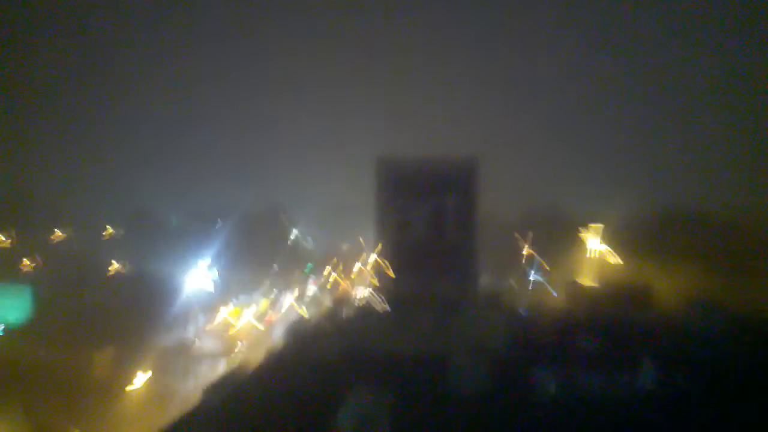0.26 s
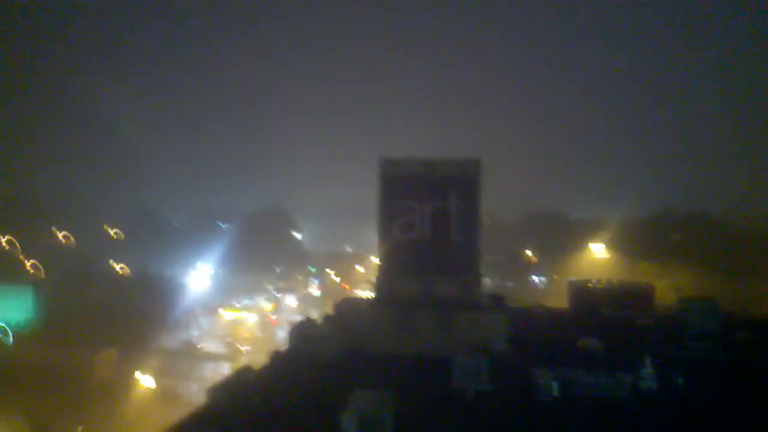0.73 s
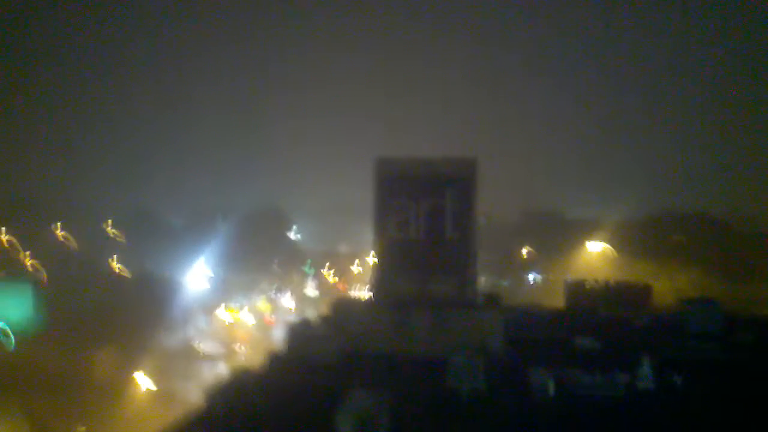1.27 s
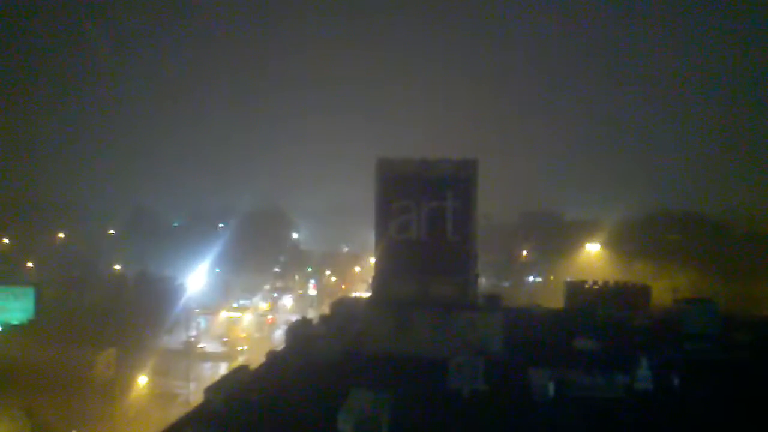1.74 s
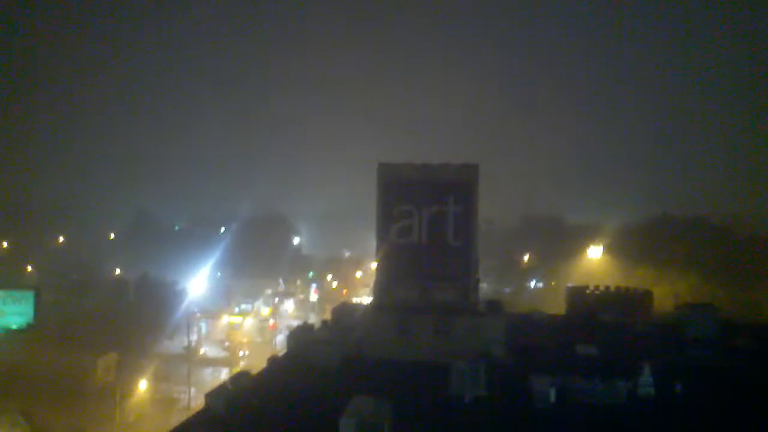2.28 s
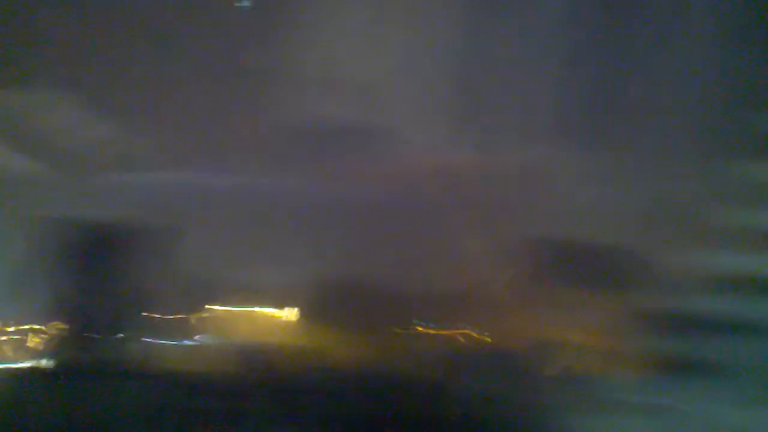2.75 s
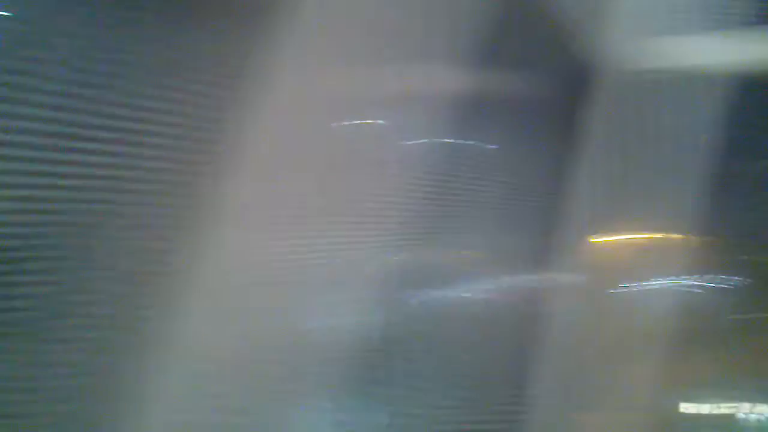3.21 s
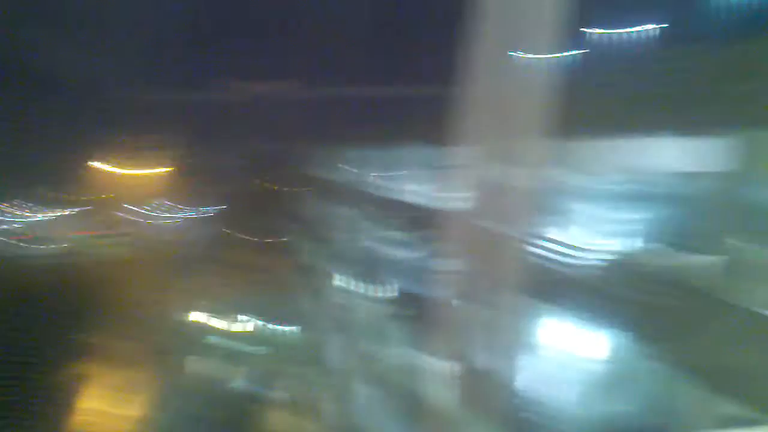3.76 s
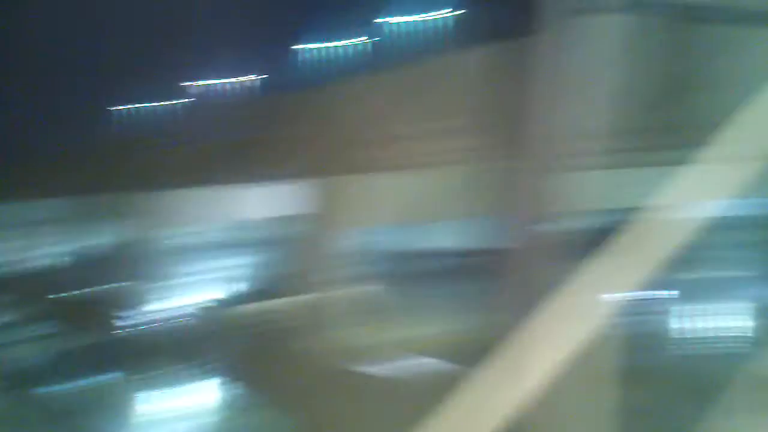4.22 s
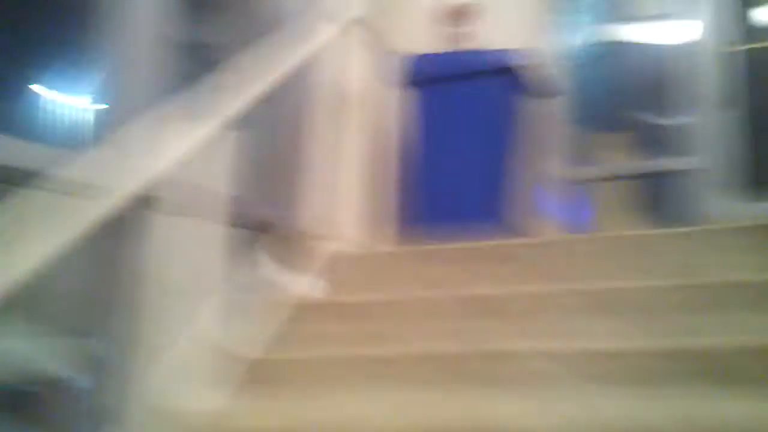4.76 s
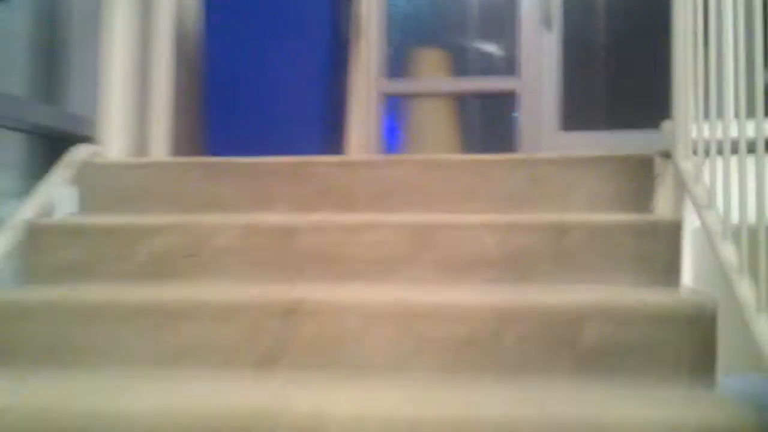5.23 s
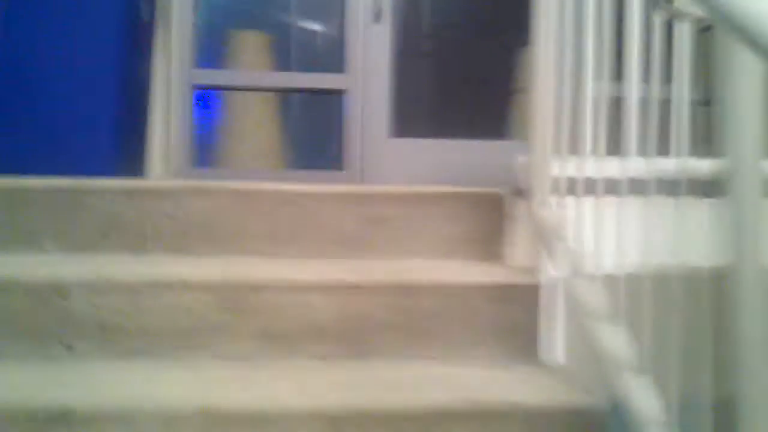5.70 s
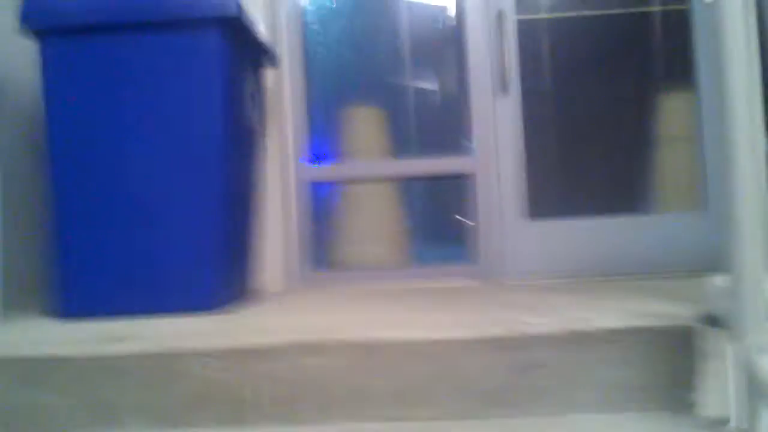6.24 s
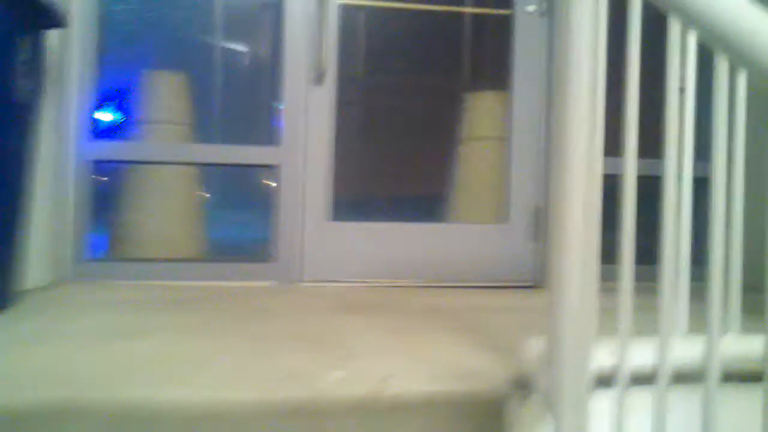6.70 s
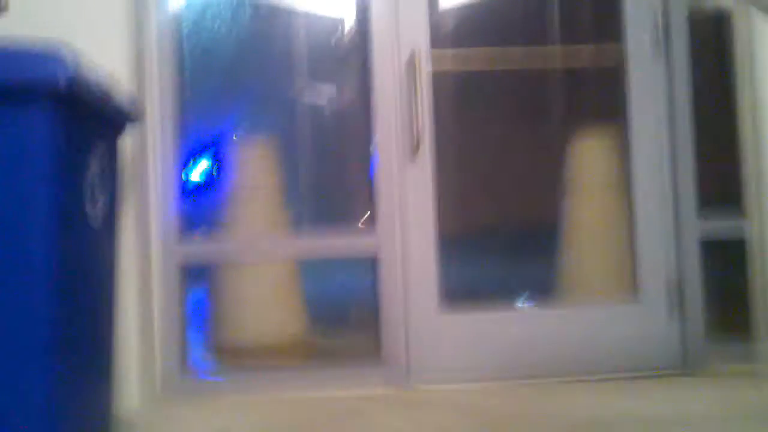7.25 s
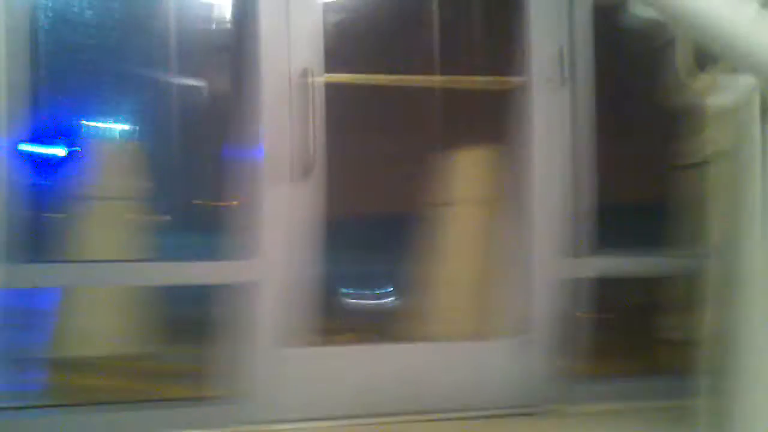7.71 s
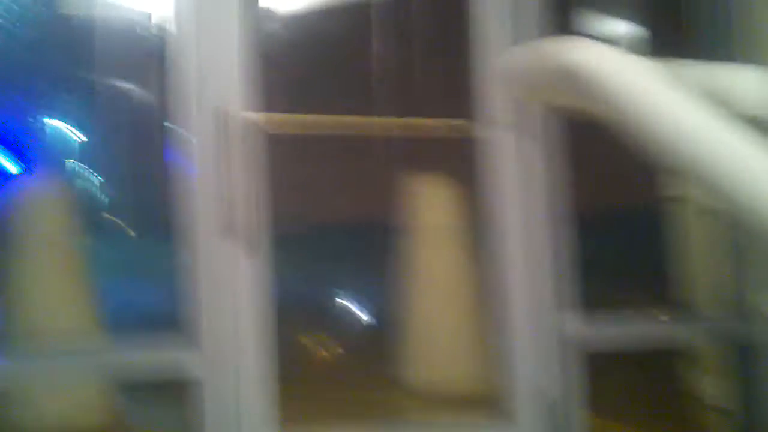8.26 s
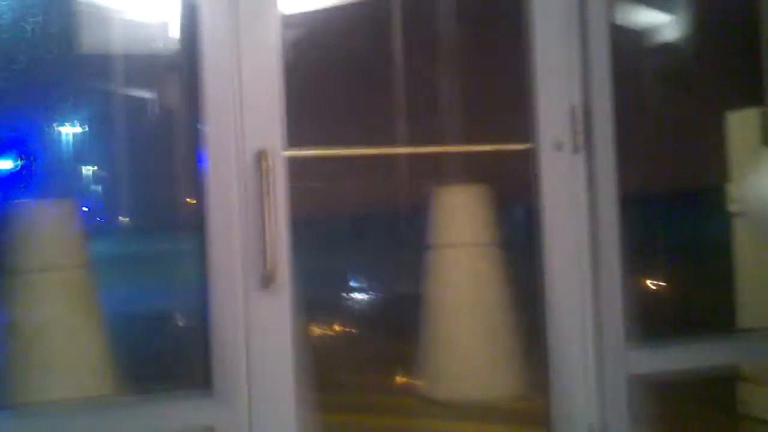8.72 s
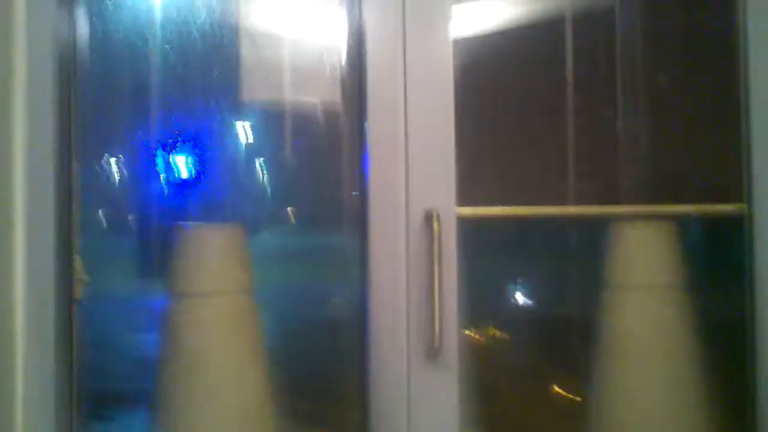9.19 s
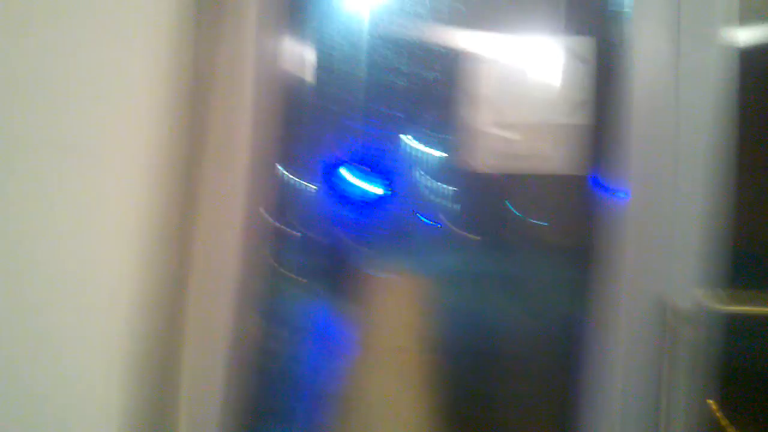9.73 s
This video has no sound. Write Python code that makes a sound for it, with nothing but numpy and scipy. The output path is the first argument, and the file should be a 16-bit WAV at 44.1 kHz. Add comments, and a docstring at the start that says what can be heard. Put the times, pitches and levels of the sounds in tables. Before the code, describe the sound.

A storm heard from inside a glass-fronted concrete stairwell on a handheld stereo phone. At first irregular, sharp hail cracks stand out over a moderate rain roar and fine ticking. Then the rain thickens into a loud broad wash, with patter on panes and doors, bright spray flurries and hollow boom. A few late hail hits give way to steady rain, with low resonances rising at the end.

```python
"""Rain and hail drive against the glass front of a concrete stairwell, heard by a phone carried along.
First, rain drums on roof and window, small hailstones tick and large ones crack on the glass close by.
After two seconds the window fades; roof and panes grow louder, spray comes in flurries and gusts swell.
Near the doors, large stones grow rarer, then stop, and two low resonances rise towards the end.
Rain is random pulses shaped by the colour of what they hit; two capsules make a left and a right beam."""
import sys
import numpy as np
from scipy import signal
from scipy.fft import rfft, irfft, next_fast_len
from scipy.io import wavfile

SR = 44100
rng = np.random.default_rng(int(sys.argv[2]) if len(sys.argv) > 2 else 0)


def dump_mix(stems):
    """Bounce the given channels to the path in sys.argv[1] as a 16-bit WAV at rate SR."""
    frames = np.atleast_2d(stems).T  # one column per channel
    limited = np.clip(frames, -1, 1)  # hard clip at full scale
    pcm = np.round(limited * 32767).astype(np.int16)
    wavfile.write(sys.argv[1], SR, pcm)


N = 439662
TIME = np.arange(N) / SR  # seconds

# Strength of the storm. Each row: time in seconds, drumming on the roof in dB, rain on the glass in dB.
STORM_STRENGTH = [(0.0, -35.5, -34), (1.15, -35.5, -33), (1.45, -34.5, -31), (2.3, -30, -31),
                  (3.15, -30.5, -28), (3.9, -25.5, -25), (4.2, -26.5, -26.5), (4.6, -25.5, -24),
                  (4.8, -26.5, -26), (5.35, -26.5, -24), (5.9, -29.5, -27), (6.2, -28.5, -25),
                  (6.75, -25.5, -25), (7.05, -26.5, -25.5), (7.95, -27, -23.5), (9.05, -27.5, -24),
                  (9.55, -30, -26), (9.97, -30, -27.5)]
# How a layer follows the storm. Values: its dB when the storm stands at STRONG_DB, dB gained per dB of storm.
WASH_FOLLOWS = (-28, 0.9)
PATTER_FOLLOWS = (-27.5, 1.31)
STRONG_DB = -26

# Colours: how strongly a thing sounds at each frequency, before its level is set.
# Hollow boom of the stairwell. Each row: frequency in Hz, strength in dB per Hz.
BOOM_COLOUR = [(20, -38), (45, -31), (70, -22), (110, -5), (170, -1.5), (255, 1.5), (320, -6), (500, -22),
               (1500, -80)]
# The boom changes from place to place. Each row: time in seconds, level in dB.
BOOM_LEVEL = [(0.0, -43.5), (1.1, -42), (1.5, -38), (2.3, -38), (3.5, -40.5), (5.0, -37.5), (7.6, -37),
              (8.5, -39), (9.97, -37.5)]
# Two narrow low resonances that grow near the doors. Each row: time in seconds, lower in dB, upper in dB.
DRONE_LEVELS = [(0, -49, -56), (4, -51, -56), (7.3, -45.5, -43), (8.2, -39, -48), (9.2, -39.5, -41),
                (9.6, -32, -38), (9.97, -36, -34)]
# Lower resonance. Each row: frequency in Hz, strength in dB per Hz.
LOWER_DRONE_COLOUR = [(60, -71), (225, -22), (246, -16), (252, 0), (258, -12), (280, -21.5), (600, -49)]
# Upper resonance. Each row: frequency in Hz, strength in dB per Hz.
HIGHER_DRONE_COLOUR = [(100, -74), (300, -19.5), (325, -10), (338, -1), (350, 5), (378, -18), (800, -57)]
# Roof under the drops. Each row: frequency in Hz, strength in dB per Hz.
ROOF_COLOUR = [(80, -51), (200, -14), (300, -5.5), (400, -2), (500, -4.5), (620, -7), (800, -12),
               (1050, -22), (3000, -52.5)]
# Wash of all the rain together. Each row: frequency in Hz, strength in dB per Hz.
WASH_COLOUR = [(60, -31.5), (250, -7.5), (580, -6.5), (730, -4.5), (900, -3), (1100, -5.5), (1350, -3.5),
               (1700, -3.5), (2600, -9), (5000, -18.5), (14000, -36)]
# Ledges outside. Each row: frequency in Hz, strength in dB per Hz.
LEDGE_COLOUR = [(350, -36), (570, -11), (660, 1.5), (760, 1), (860, -2), (1200, -35.5)]
# Rain drumming on the ledges. Each row: time in seconds, level in dB.
LEDGE_LEVEL = [(0, -44), (1.25, -52), (1.5, -38), (2.05, -47), (2.25, -34.5), (2.5, -40), (2.72, -32),
               (2.9, -46), (3.6, -41), (4.1, -37), (4.6, -36), (4.74, -48), (5.0, -33.5), (5.4, -36),
               (5.85, -39.5), (6.7, -36.5), (8.0, -35), (9.0, -36), (9.7, -41)]
# Gusts on single panels. Each row: time of the peak in seconds, level in dB, panel pitch in Hz,
# half length in seconds.
PANEL_GUSTS = [(2.08, -40, 1180, .25), (3.75, -32, 424, 0.26), (3.88, -36.5, 1150, 0.23),
               (4.3, -39, 1120, .2), (4.42, -30, 435, 0.15), (5.17, -39, 590, .18), (5.2, -35, 375, 0.17),
               (5.72, -37.5, 225, .15), (6.72, -32.5, 377, 0.12), (7.92, -31.5, 500, .14),
               (7.98, -37, 1465, .22)]
PANEL_WIDTH_HZ = 80  # half width of a panel's resonance

# Fine spray between flurries. Each row: time in seconds, level in dB.
STEADY_SPRAY = [(0, -44), (.7, -44.5), (1.2, -41.5), (1.55, -40.5), (2.25, -39.5), (2.4, -50), (2.7, -37.5),
                (3.3, -37), (4.3, -31.5), (4.85, -34), (5.2, -30.5), (5.95, -32.5), (6.4, -31.5),
                (7.3, -32.5), (8.4, -31), (9.05, -30.5), (9.45, -31.5), (9.97, -33.5)]
# Spray on the glass. Each row: frequency in Hz, strength in dB per Hz.
SPRAY_COLOUR = [(1000, -45), (3000, 1), (5000, -13), (6100, -2), (7400, 3), (8500, 2.5), (10000, 0),
                (12000, -2), (13000, -5.5), (14000, -7.5)]
# Flurries of drops. Each row: onset in seconds, peak of the added burst in dB relative to the steady fall,
# rise time in seconds, decay time in seconds.
FLURRY_TABLE = [(.125, 8, .016, .022), (.77, 10, 0.015, 0.044), (1.24, 7.5, .09, 0.082),
                (1.66, 7, .012, .027), (1.87, 5, .04, .08), (2.448, 12, .012, 0.044),
                (2.54, 10, .014, 0.034), (2.8, 5, .014, .04), (4.56, 6, .05, .08), (4.65, 2, .03, .02),
                (5.02, 4.5, 0.04, .1), (5.27, 3, 0.035, 0.063), (5.5, -4, .03, .07),
                (6.025, 6, 0.01, 0.062), (6.53, 2, 0.023, .05), (6.64, 2, .025, .045), (7.5, -7, .02, 0.02),
                (7.9, 5.5, .02, 0.071), (8.48, -1, .04, .1)]
# Near panes under rain. Each row: frequency in Hz, strength in dB per Hz.
PANE_COLOUR = [(400, -40), (1100, -23.5), (1600, -9), (1900, 3.5), (2350, 3), (2900, -8), (3500, -10.5),
               (4300, -13.5), (5200, -14.5), (6200, -11), (7400, -10), (9000, -14), (14000, -26)]
# Rain on the doors. Each row: time in seconds, level in dB.
DOOR_LEVEL = [(0, -47), (3.3, -52), (3.9, -45), (4.3, -53), (4.65, -34), (4.85, -36.5), (5.5, -36),
              (5.95, -38), (6.15, -36), (7.4, -34), (8.5, -34), (9.15, -32.5), (9.97, -38)]
# Door glass, which rings higher than the window's. Each row: frequency in Hz, strength in dB per Hz.
DOOR_COLOUR = [(900, -40), (2200, -17.5), (2900, 3.5), (3400, -0.5), (4200, -6.5), (5200, -10), (7000, -23),
               (14000, -34)]
# First window, which rings at a few pitches. Each row: frequency in Hz, strength in dB per Hz.
WINDOW_COLOUR = [(40, -58), (250, -18), (560, -13.5), (720, -2), (900, -14.5), (1300, -8.5), (1650, -19),
                 (2900, -30), (3500, -14), (4200, -20.5), (9000, -33)]
# Small hailstones on that window. Each row: frequency in Hz, strength in dB per Hz.
SMALL_HAIL_COLOUR = [(100, -46), (900, -12), (2500, -21), (3500, 17.5), (4800, -15), (6200, 20), (7700, 11),
                     (9000, 12), (11000, 1), (14000, 0)]
# First window: level against the roof, when it is left, how fast it fades, and by how much in all.
WINDOW_DB, LEAVE_S, LEAVE_DB_PER_S, LEFT_BEHIND_DB = -0.5, 2.15, 22, 27
# Small hailstones: average count per second, level against the window's drops, spread of sizes.
PELLETS_PER_S, PELLET_DB, PELLET_SCATTER_DB = 56, -22, 4

# Large hailstones close by. Each row: time in seconds, snap in dB, pitch of the snap in Hz,
# ring of the glass in dB, knock of the pane in dB, decay time of knock and splinters in seconds.
HAILSTONES = [(0.124, -12, 7600, -22, -15, 0.006), (.140, -27, 7800, -29, -29, .006),
              (.146, -20, 7700, -37, -32, .011), (.1684, -18, 7500, -24, -23, .0088),
              (.185, -32, 7600, -30, -31, .005), (.4074, -11, 11100, -13.5, -19.5, 0.0072),
              (.4682, -37, 7000, -27, -23, .007), (.6163, -35, 7000, -38, -23, .006),
              (.684, -33, 7500, -32, -28, .0055), (.762, -20, 7500, -30, -37, .005),
              (.7802, -28, 7500, -28, -26, 0.0066), (.868, -36, 7000, -34, -24, .006),
              (.881, -34, 7500, -25, -24, 0.0097), (0.984, -26, 7000, -28, -23, .008),
              (1.18, -23, 7500, -27, -33, .005), (1.350, -27, 8000, -27, -26, .005),
              (1.3645, -18, 7900, -19, -21, .008), (1.416, -35, 7000, -35, -21, .005),
              (1.540, -29, 7600, -25, -21, 0.0077), (1.558, -38, 7500, -26, -19, .009),
              (1.668, -22, 7500, -29, -31, .006), (1.775, -35, 7500, -26, -30, 0.0044),
              (1.9583, -11.5, 10160, -26, -20, .012), (1.962, -27, 7300, -27, -16.5, .007),
              (1.9693, -31, 7300, -22, -17, .009), (2.0149, -8.5, 8340, -10.5, -22, 0.006),
              (2.073, -26, 11300, -36, -32, .004), (2.295, -32, 8000, -33, -21, .006),
              (2.3063, -11.5, 8140, -31, -23, .006), (2.4474, -15, 11500, -22, -21, .005),
              (2.4635, -23, 11000, -27, -22, .008), (2.481, -25, 8600, -33, -28, .005),
              (2.557, -30, 7500, -30, -31, .005), (2.716, -31, 7500, -35, -23.5, .0085),
              (2.809, -20, 6700, -28, -21, .01), (4.570, -19, 8000, -30, -32, .008),
              (4.686, -14, 8700, -30, -35, .014), (4.893, -28, 7500, -22, -26, .005),
              (5.304, -22, 8000, -26, -26, .006), (6.0305, -22, 10400, -14, -28, 0.0093),
              (6.048, -24, 9000, -20, -23, .007), (6.305, -28, 7500, -18, -30, .005)]
# Snap of a stone. Each row: frequency in Hz, strength in dB per Hz.
SNAP_COLOUR = [(1000, -22), (3500, -9), (4800, -12), (6200, 5), (9000, 4.5), (11500, 3), (14000, -9.5)]
SPOT_DB, SPOT_WIDTH_HZ = 6, 920  # boost at the snap's own pitch, and its half width
# Knock of the pane. Each row: frequency in Hz, strength in dB per Hz.
KNOCK_COLOUR = [(40, -42), (200, -12), (550, -0.5), (1400, 3), (2000, 11), (2800, 4.5), (3500, -2),
                (4600, -5), (8000, -12), (14000, -49)]
# Struck spot: pitch, its spread as a share, decay time, lag at the second capsule.
RING_HZ, RING_SPREAD, RING_S, RING_LAG_S = 3610, .02, 0.0013, .00003

CAPSULE_LAG = 17  # longest lag between the two capsules, in samples
BEAM_NULL_HZ = 2610  # the beams' delay lasts one cycle here, which leaves a narrow hollow
# How much of the other capsule each channel subtracts. Each row: frequency in Hz, share from 0 to 1.
OTHER_CAPSULE_SHARE = [(4150, 1), (4500, .35), (5300, .33), (7000, .13), (14000, .2)]
# Extra narrow cut around 2.6 kHz in the middle of the stereo image. Each row: frequency in Hz, gain in dB.
MIDDLE_CUT = [(2490, 0), (2550, -7), (2660, -8), (2720, 0)]
TOP_HZ = 13950  # the treble is cut above this


def undb(db):
    """Turn decibels into gain."""
    return 10 ** (np.asarray(db) / 20)


def curves(table):
    """Turn each column of a table into a curve over time."""
    s, *columns = np.transpose(table)
    return [np.interp(TIME, s, column) for column in columns]


def walk(rate):
    """Wander in straight lines between random levels, `rate` of them a second; the spread is near 1."""
    levels = rng.standard_normal(2048)
    return 1.2 * np.interp(TIME * rate, np.arange(len(levels)), levels)


def follow(storm_db, law):
    """Level of a layer that rises and falls with the storm."""
    strong_db, slope = law
    return strong_db + slope * (storm_db - STRONG_DB)


def ring(pulses, colour, size=4096):
    """A struck body answers each pulse only afterwards, with its own colour; the energy is kept."""
    hz, db = np.transpose(colour)
    grid = np.maximum(np.fft.rfftfreq(size, 1 / SR), 1)
    gain = undb(np.interp(np.log(grid), np.log(hz), db))
    # folding the cepstrum forward puts the energy as early as this colour allows (minimum phase)
    cepstrum = irfft(np.log(gain))
    cepstrum[1:size // 2] *= 2
    cepstrum[size // 2 + 1:] = 0
    response = irfft(np.exp(rfft(cepstrum)))
    response = response / np.linalg.norm(response)
    return signal.oaconvolve(pulses, response[None], axes=1)[:, :pulses.shape[1]]


def impacts(strength, rate, scatter_db, side, width):
    """Random hits, on average `rate` a second; each has its own size, direction and lag between capsules."""
    n = len(strength)
    hit = rng.random(n) < rate / SR
    sign = np.sign(rng.standard_normal(n))
    size = hit * sign * undb(scatter_db * rng.standard_normal(n))
    size = size * strength / np.std(size)
    bearing = np.clip(side + width * rng.uniform(-1, 1, n), -1, 1)
    lag = np.round(CAPSULE_LAG * bearing).astype(int)
    arrival = (np.arange(n) + lag) % n
    return np.array([size, np.bincount(arrival, size, n)])


def stairwell_boom():
    """Dense pulses excite the hollow low boom of the stairwell, with a level that wavers."""
    level_db, = curves(BOOM_LEVEL)
    strength = undb(level_db + 0.87 * walk(rate=9))
    return ring(impacts(strength, rate=5000, scatter_db=0.5, side=-0.32, width=1.44), BOOM_COLOUR)


def low_resonances():
    """Dense pulses excite two narrow bands, so each hums near one pitch."""
    lower_db, upper_db = curves(DRONE_LEVELS)
    lower = impacts(undb(lower_db), rate=5000, scatter_db=1.5, side=0, width=0.42)
    upper = impacts(undb(upper_db), rate=5000, scatter_db=1.0, side=0, width=0.37)
    # the longer response leaves room for the narrower resonance
    return ring(lower, LOWER_DRONE_COLOUR, size=16384) + ring(upper, HIGHER_DRONE_COLOUR)


def roof_drumming(roof_db):
    """Heavy drops strike the roof so often that they merge into a roar."""
    strength = undb(roof_db + 0.33 * walk(rate=14))
    return ring(impacts(strength, rate=8000, scatter_db=2, side=-0.056, width=0.9), ROOF_COLOUR)


def rain_wash(roof_db, glass_db):
    """Very dense drops blend into a broad wash that follows the storm on roof and glass."""
    level_db = follow((roof_db + glass_db) / 2, WASH_FOLLOWS)
    strength = undb(level_db + 1.3 * walk(rate=17))
    return ring(impacts(strength, rate=14000, scatter_db=2.5, side=-0.044, width=0.9), WASH_COLOUR)


def ledge_rain():
    """Drops drum on the ledges outside, which resound in one band."""
    level_db, = curves(LEDGE_LEVEL)
    return ring(impacts(undb(level_db), rate=3000, scatter_db=2.5, side=-0.043, width=.85), LEDGE_COLOUR)


def gusts_on_panels():
    """Each gust presses rain onto one panel of roof or wall, whose resonance swells and sinks back."""
    out = np.zeros((2, N))
    hz = np.geomspace(40, 6000, 200)
    for s, level_db, panel_hz, half_s in PANEL_GUSTS:
        span = np.abs(TIME - s) < .7
        swell = undb(level_db) * np.exp(-.5 * ((TIME[span] - s) / half_s) ** 2)
        colour_db = -20 * np.log10(1 + ((hz - panel_hz) / PANEL_WIDTH_HZ) ** 2)
        drops = impacts(swell, rate=4000, scatter_db=2, side=-.04, width=0.78)
        out[:, span] += ring(drops, np.c_[hz, colour_db])
    return out


def flurries():
    """Gain for spray and door rain: each flurry adds a burst of power that swells and dies away."""
    power = np.ones(N)  # the steady fall
    for s, peak_db, rise_s, decay_s in FLURRY_TABLE:
        first = int(s * SR)
        age = TIME[:min(SR // 2, N - first)]
        swell = np.minimum(age / max(rise_s, 1e-3), 1)
        release = np.exp(-np.maximum(age - rise_s, 0) / max(decay_s, 1e-3))
        power[first:first + len(age)] += (undb(peak_db) * swell * release) ** 2
    return np.sqrt(power)


def spray_on_glass(flutter, gusts, surge):
    """Fine drops blown at the glass hiss in the treble, with flutter, gusts and flurries."""
    level_db, = curves(STEADY_SPRAY)
    waver_db = 0.79 * flutter + 0.37 * gusts + 1.0 * walk(rate=36)
    strength = undb(level_db + waver_db) * surge
    return ring(impacts(strength, rate=12000, scatter_db=2.5, side=0, width=0.98), SPRAY_COLOUR)


def first_window(roof_db, flutter):
    """Drops and small hailstones make the first window ring; both fade as it is left behind."""
    faded_db = np.clip((TIME - LEAVE_S) * LEAVE_DB_PER_S, 0, LEFT_BEHIND_DB)
    level_db = roof_db + WINDOW_DB - faded_db
    drops = impacts(undb(level_db + 1.0 * flutter), rate=2500, scatter_db=1.0, side=0, width=0.89)
    pellets = impacts(undb(level_db + PELLET_DB), rate=PELLETS_PER_S, scatter_db=PELLET_SCATTER_DB,
                      side=0, width=0.57)
    return ring(drops, WINDOW_COLOUR) + ring(pellets, SMALL_HAIL_COLOUR)


def bounces(sound, wall_db=-12, drift_s=0.000393, count=4):
    """Echoes off glass and concrete; paths change as the phone is carried, so the colour slowly shifts."""
    out, gain = sound, undb(wall_db)
    for path_s in rng.uniform(.005, .035, count):
        then = TIME - path_s - drift_s * walk(rate=0.99)
        echo = np.array([np.interp(then, TIME, capsule, left=0) for capsule in sound])
        out = out + gain * echo
    return out / np.sqrt(1 + count * gain ** 2)


def rain_on_panes_and_doors(glass_db, flutter, gusts, surge):
    """Drops patter on the near panes and on the higher-ringing doors; both echo off the walls."""
    door_db, = curves(DOOR_LEVEL)
    pane_db = follow(glass_db, PATTER_FOLLOWS) + 1.15 * flutter + 0.56 * gusts
    patter = impacts(undb(pane_db), rate=10000, scatter_db=3, side=-.03, width=1.02)
    door_strength = undb(door_db + 0.63 * flutter) * surge
    doors = impacts(door_strength, rate=7000, scatter_db=1, side=0, width=0.95)
    return bounces(ring(patter, PANE_COLOUR) + ring(doors, DOOR_COLOUR))


def rain():
    """All the rain layers; those on the near glass share one flutter, so they waver together."""
    roof_db, glass_db = curves(STORM_STRENGTH)
    flutter, gusts, surge = walk(rate=30), walk(rate=13), flurries()
    roar = stairwell_boom() + low_resonances() + roof_drumming(roof_db) + rain_wash(roof_db, glass_db)
    glass = spray_on_glass(flutter, gusts, surge) + first_window(roof_db, flutter)
    glass = glass + rain_on_panes_and_doors(glass_db, flutter, gusts, surge)
    return roar + ledge_rain() + glass


def glass_ring(age):
    """The struck spot rings for a few cycles, at a pitch that varies a little from stone to stone."""
    hz = RING_HZ * (1 + RING_SPREAD * rng.standard_normal())
    age = np.maximum(age - np.array([[0], [RING_LAG_S]]), 0)
    return np.sin(2 * np.pi * hz * age) * np.exp(-age / RING_S)


def hail(snap_s=0.00053, shatter_db=-14, room_s=0.032, snap_room_db=-23, knock_room_db=-20, flex_share=0.082):
    """Each stone snaps, splinters, rings the glass and knocks the flexing pane; the stairwell adds a tail."""
    out = np.zeros((2, N))
    age = TIME[:SR // 6]
    hz = np.linspace(500, 14000, 100)

    def fade(decay_s):
        """Power that dies away; the 2 makes decay_s the decay time of the amplitude."""
        return np.exp(-2 * age / max(decay_s, 1e-4))

    for s, snap_db, snap_hz, ring_db, knock_db, decay_s in HAILSTONES:
        body, tail = fade(decay_s), fade(room_s)
        # doubled dB turn the gains into powers, to match the fades
        splinters = undb(2 * shatter_db) * body
        snap_power = fade(snap_s) + splinters + undb(2 * snap_room_db) * tail
        flex = 1 - fade(flex_share * decay_s)  # the pane takes a moment to give way
        knock_power = flex * (body + undb(2 * knock_room_db) * tail)
        snaps = impacts(undb(snap_db) * np.sqrt(snap_power), rate=40000, scatter_db=1, side=.3, width=.8)
        knocks = impacts(undb(knock_db) * np.sqrt(knock_power), rate=16000, scatter_db=2, side=.05, width=.9)
        spot = SPOT_DB / (1 + ((hz - snap_hz) / SPOT_WIDTH_HZ) ** 2)
        snap_colour = np.interp(hz, *np.transpose(SNAP_COLOUR)) + spot
        stone = ring(snaps, np.c_[hz, snap_colour]) + ring(knocks, KNOCK_COLOUR)
        stone = stone + undb(ring_db) * glass_ring(age)
        first = int(s * SR)
        out[:, first:first + len(age)] += stone
    return out


def scene():
    """Rain, gusts and hail as they reach the two capsules."""
    return rain() + gusts_on_panels() + hail()


def beams(capsules):
    """Each channel is its capsule minus the delayed other one, levelled for sound from all round."""
    size = next_fast_len(N + SR // 4)
    spectrum, hz = rfft(capsules, size), np.fft.rfftfreq(size, 1 / SR)
    turn = 2 * np.pi * hz / BEAM_NULL_HZ  # the delay as a phase angle
    depth = np.interp(hz, *np.transpose(OTHER_CAPSULE_SHARE))
    diffuse_power = 1 + depth ** 2 - 2 * depth * np.cos(turn) * np.sinc(turn / np.pi)
    other = depth * np.exp(-1j * turn) * spectrum[::-1]
    # the small constant makes the levelling stop short of the deepest bass
    beam = (spectrum - other) / np.sqrt(diffuse_power + .02)
    # an extra narrow cut around 2.6 kHz in the middle of the stereo image
    cut = 1 - undb(np.interp(hz, *np.transpose(MIDDLE_CUT)))
    middle = beam.mean(axis=0)
    return irfft(beam - cut * middle, size)[:, :N]


def record(dry):
    """The phone forms its two beams, drops the rumble, rounds the highest peaks and cuts the top."""
    no_rumble = signal.butter(2, 30, "highpass", fs=SR, output="sos")
    sound = signal.sosfilt(no_rumble, beams(dry))
    rounded = sound / (1 + (sound / .6) ** 4) ** .25
    no_top = signal.ellip(12, .1, 80, TOP_HZ, fs=SR, output="sos")
    return signal.sosfilt(no_top, rounded)


dry = scene()
out = record(dry)
dump_mix(out)
```